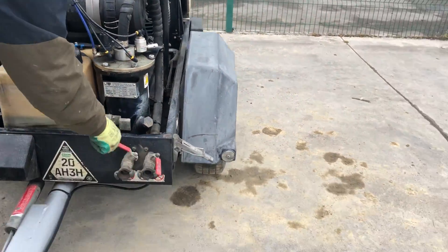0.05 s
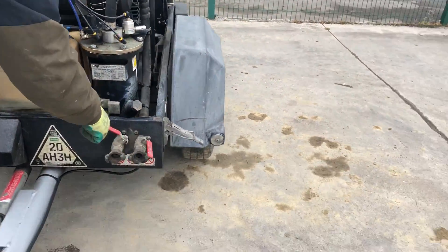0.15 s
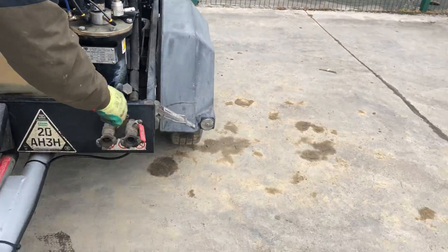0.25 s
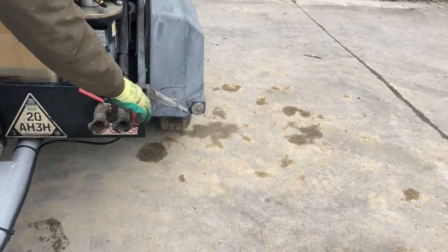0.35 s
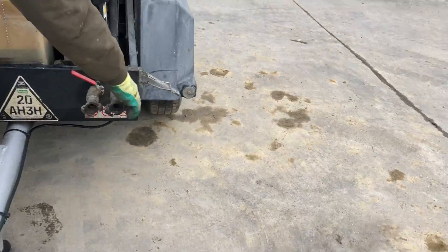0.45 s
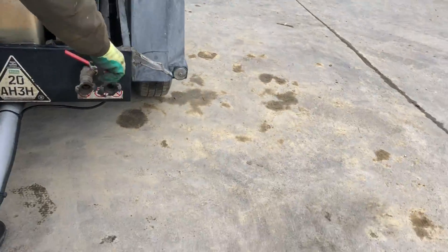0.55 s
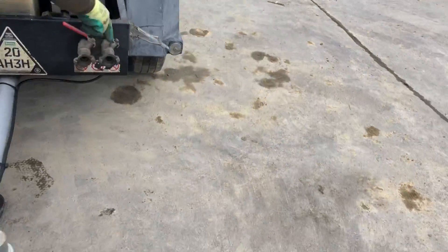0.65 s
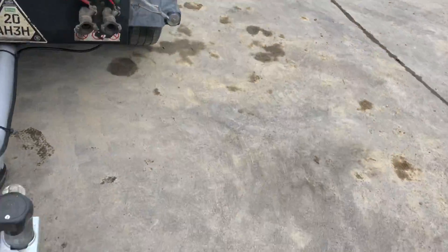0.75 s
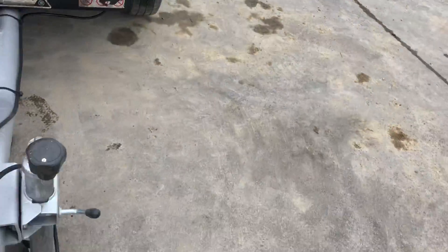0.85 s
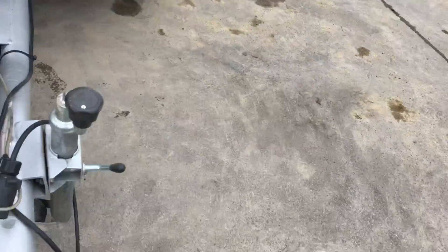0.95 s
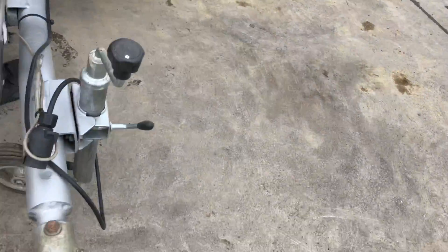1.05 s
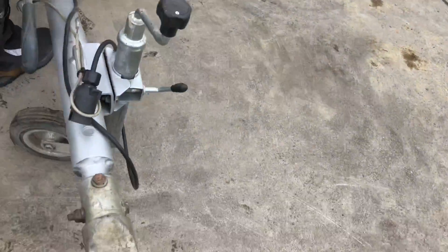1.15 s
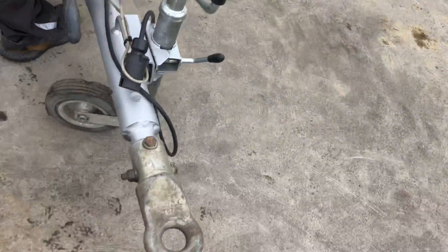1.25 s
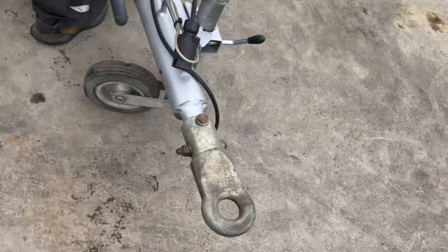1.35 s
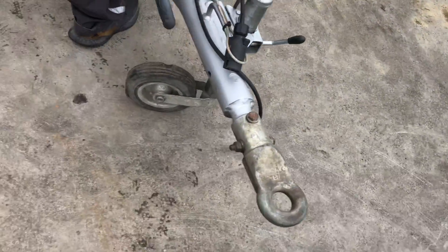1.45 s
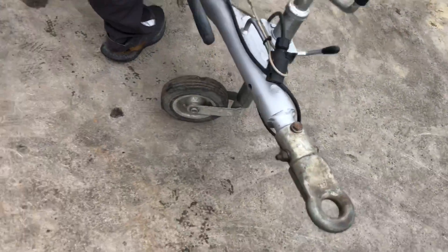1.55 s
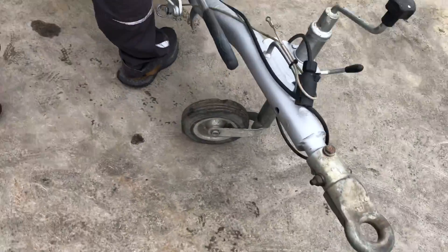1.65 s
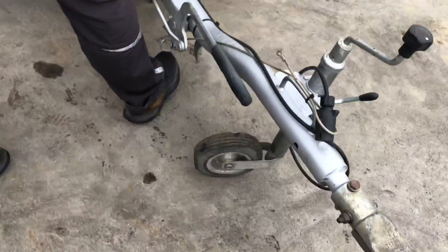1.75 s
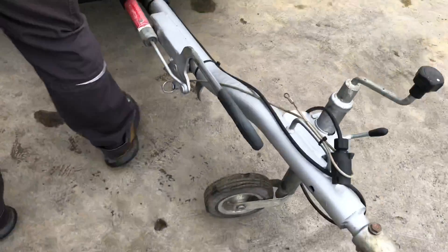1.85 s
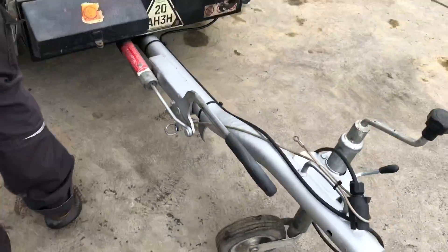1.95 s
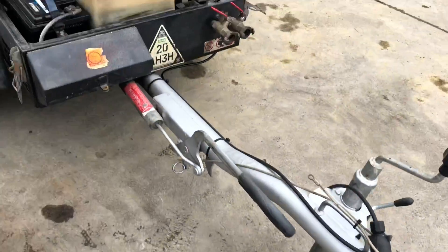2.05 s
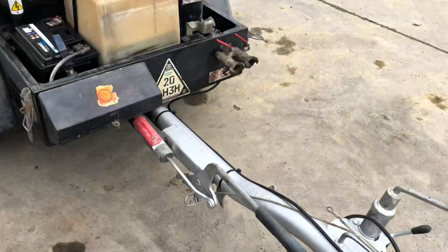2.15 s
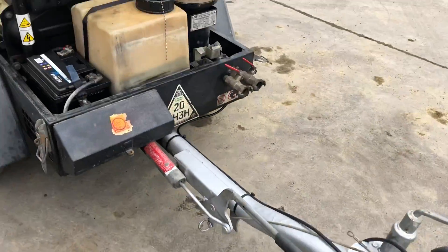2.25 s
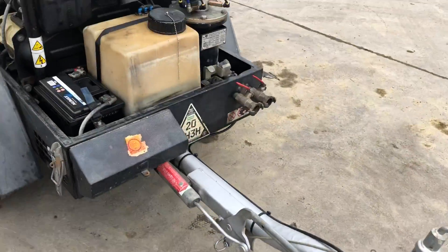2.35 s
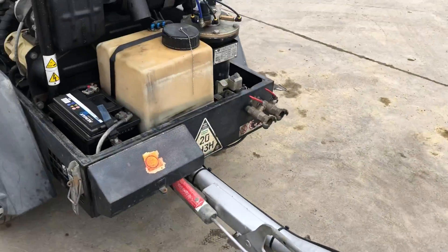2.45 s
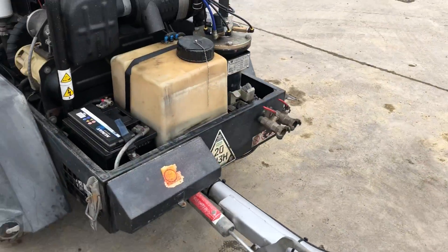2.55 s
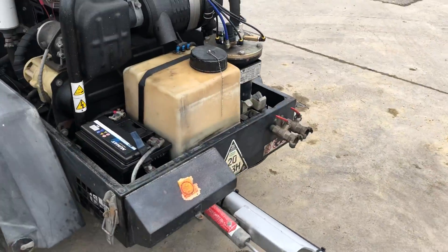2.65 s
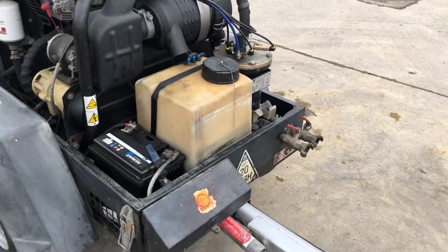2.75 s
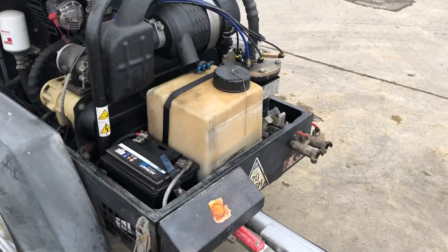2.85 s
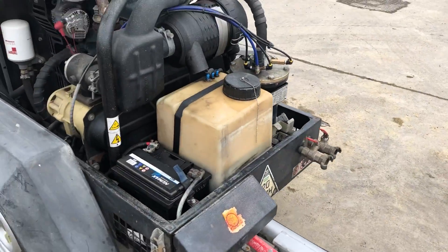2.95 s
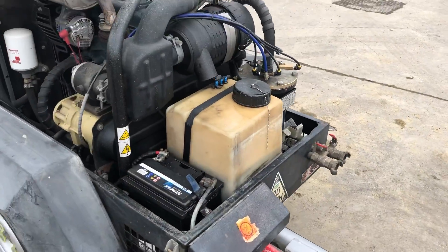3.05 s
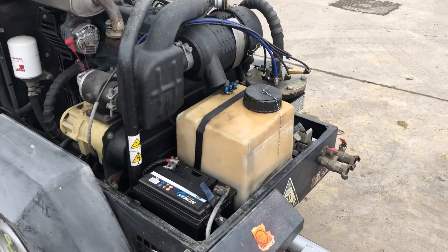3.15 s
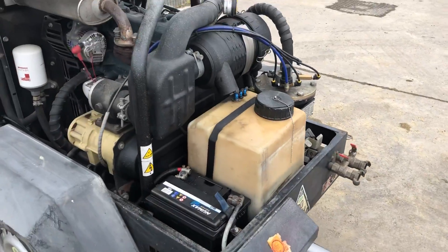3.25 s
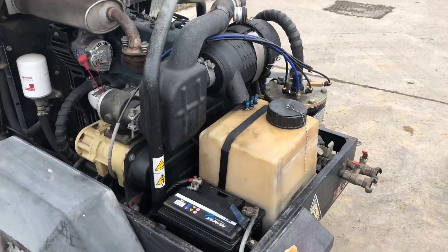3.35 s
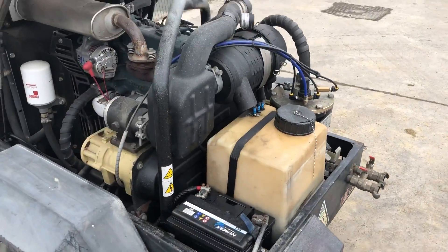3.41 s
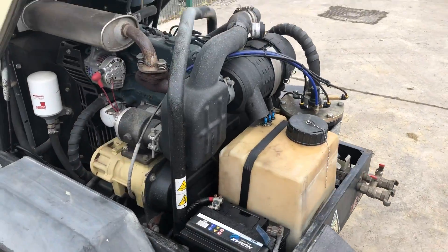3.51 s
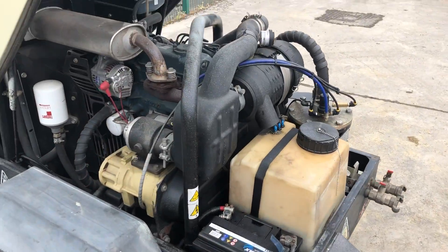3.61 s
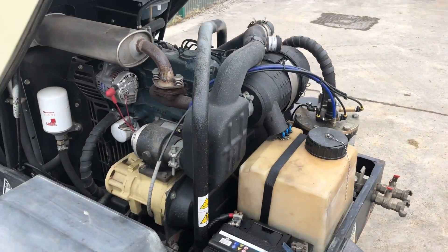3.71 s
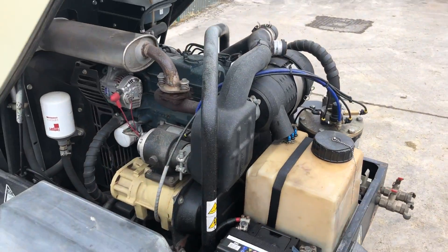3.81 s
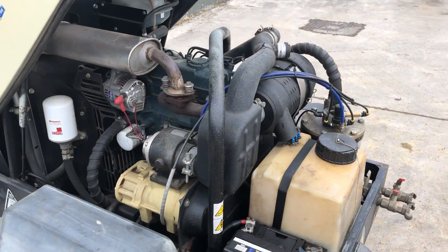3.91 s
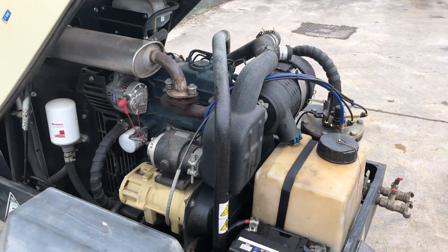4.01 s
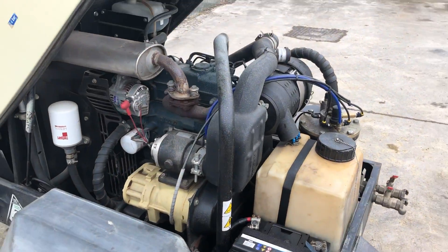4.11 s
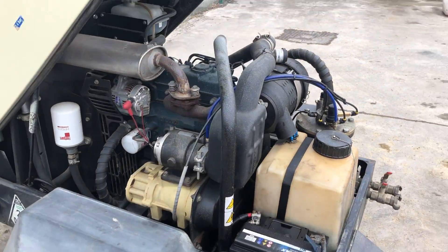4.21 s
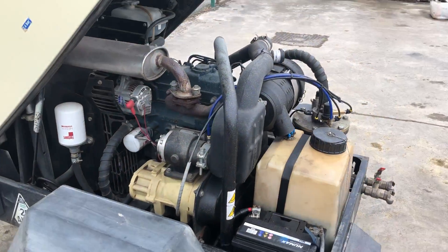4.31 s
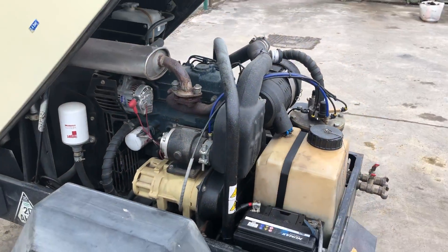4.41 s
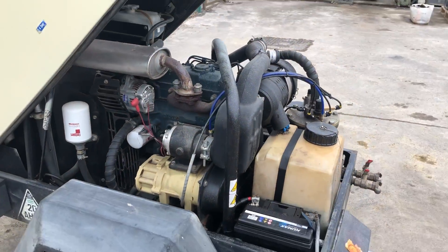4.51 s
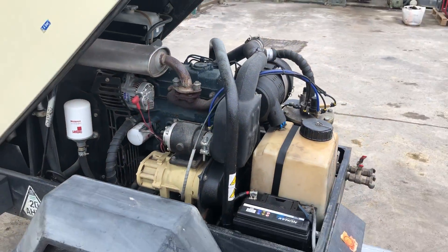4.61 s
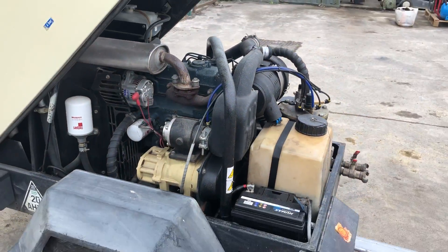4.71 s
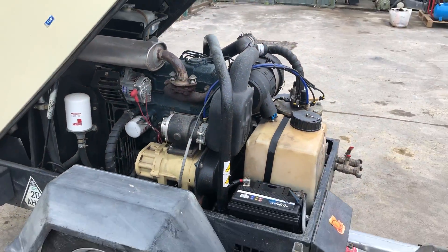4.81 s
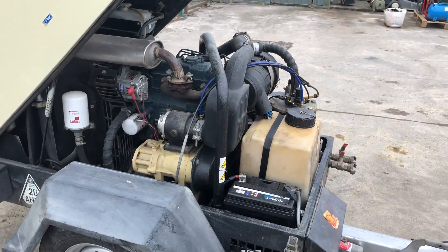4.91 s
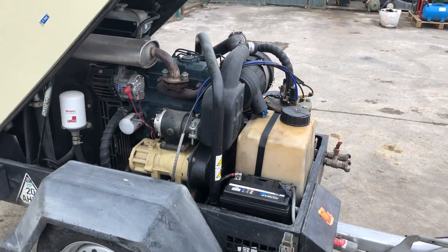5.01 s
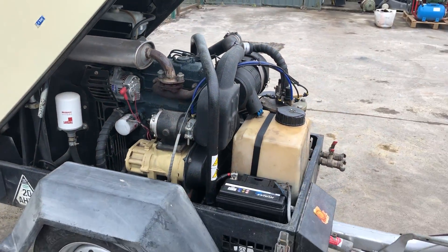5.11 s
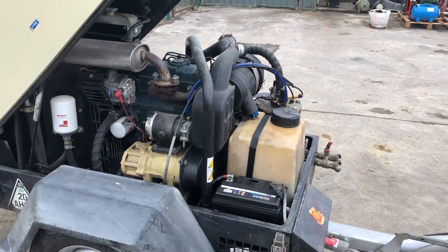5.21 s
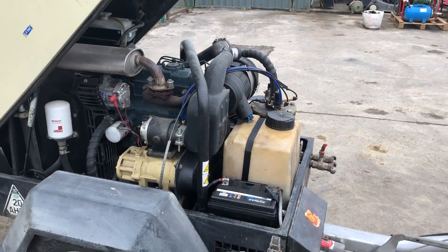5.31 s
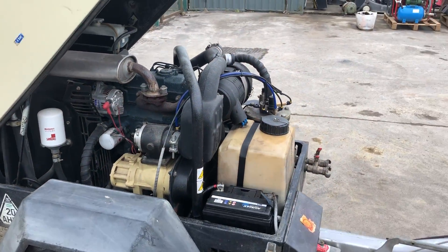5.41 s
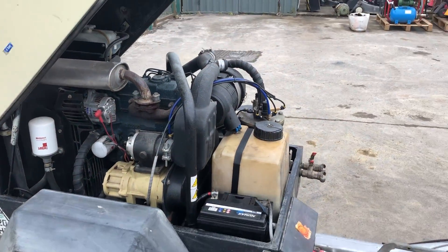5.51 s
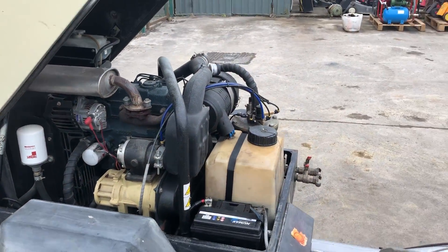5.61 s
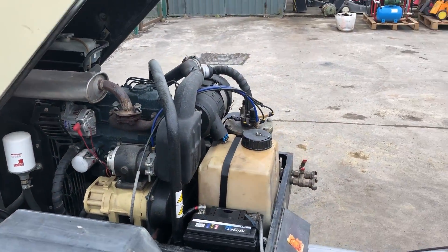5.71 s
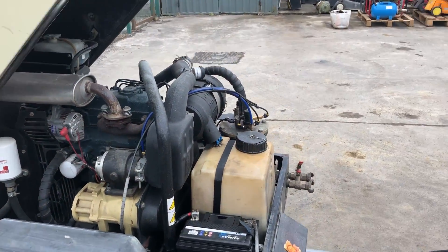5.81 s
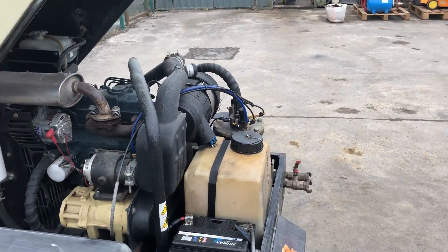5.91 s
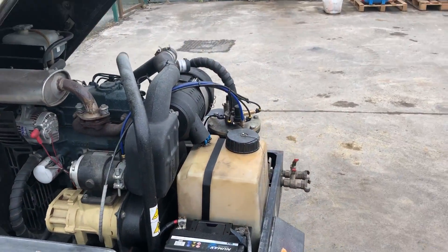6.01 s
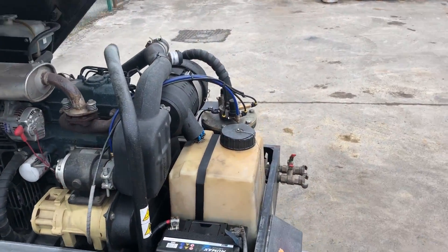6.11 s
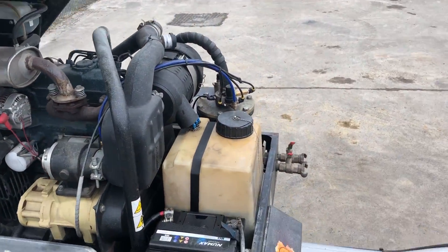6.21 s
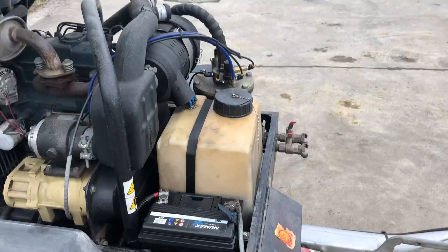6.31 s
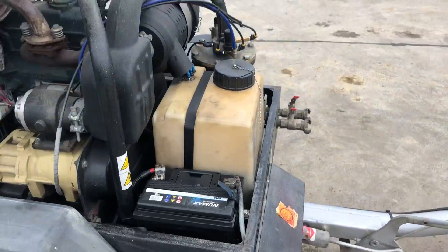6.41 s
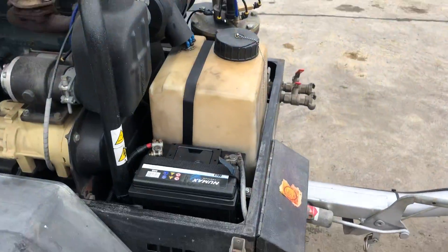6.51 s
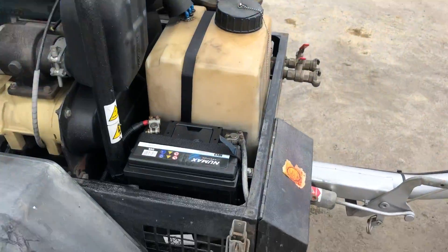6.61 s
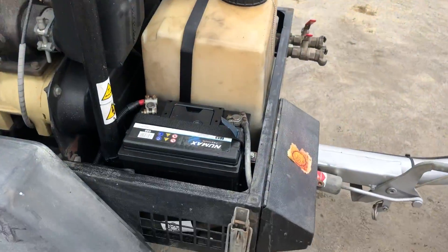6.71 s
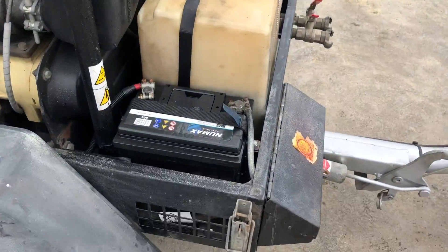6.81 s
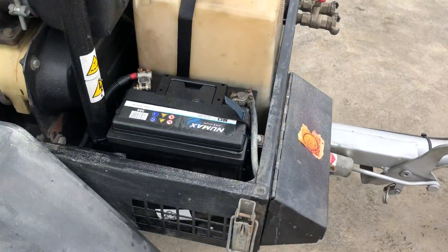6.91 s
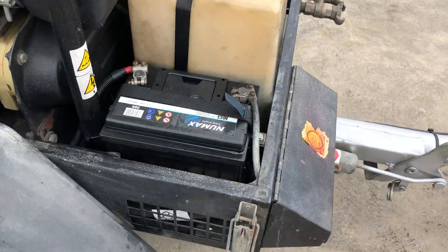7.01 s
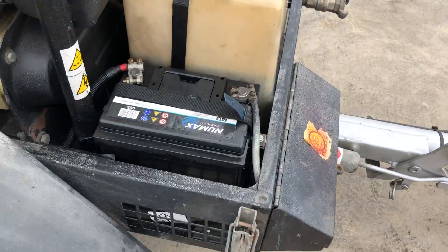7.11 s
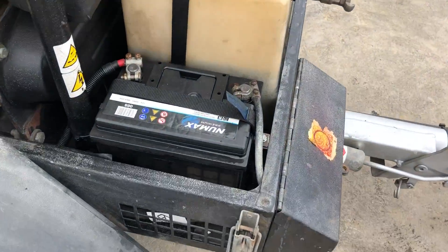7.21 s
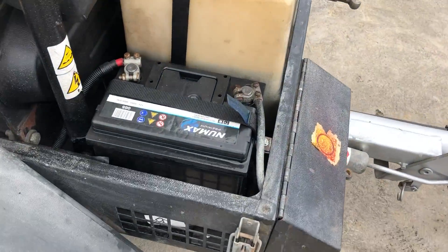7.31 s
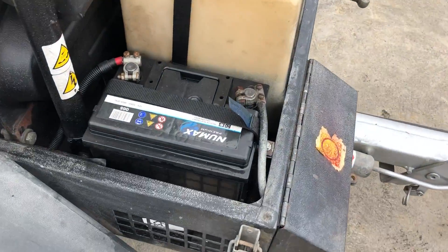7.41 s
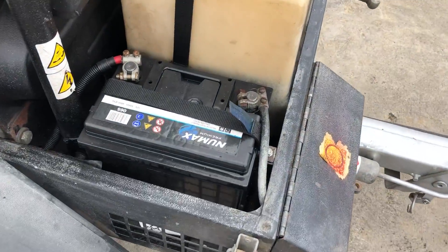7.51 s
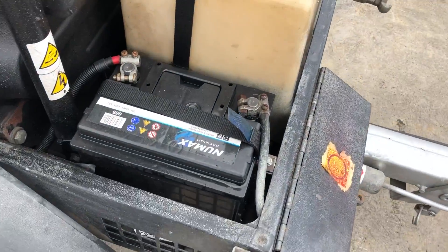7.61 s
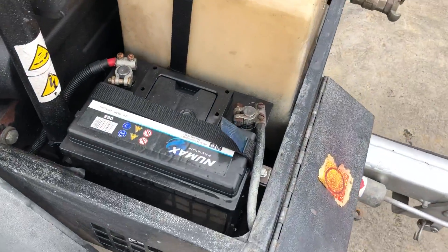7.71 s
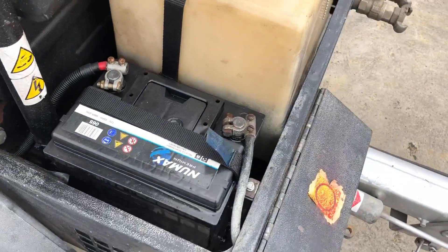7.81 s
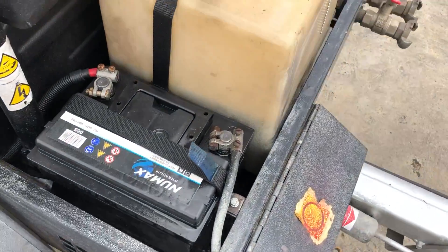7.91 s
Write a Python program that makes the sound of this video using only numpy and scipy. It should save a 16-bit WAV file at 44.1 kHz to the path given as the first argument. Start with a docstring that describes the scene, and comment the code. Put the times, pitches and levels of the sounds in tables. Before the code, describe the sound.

Compressed air hisses loudly from an open valve, chokes off abruptly, then a diesel compressor drops to idle and its clatter grows louder up close.

```python
"""Air compressor: outlet valve shut, then a walk to the engine

A three-cylinder diesel air compressor runs in a concrete yard while air roars from its open outlet valve: combed noise.
Puffs of air thump the microphone as falling tones, thickest as the valve closes; once it is shut, the unloaded
engine drops to idle. The microphone is carried round the drawbar to the open canopy, where knock and clatter
(blows ringing the block), fan and whine (tones geared to the engine) grow loud."""
import sys
import numpy as np
from scipy import signal
from scipy.fft import rfft, irfft, next_fast_len
from scipy.io import wavfile
from scipy.ndimage import map_coordinates

SR = 44100
rng = np.random.default_rng(int(sys.argv[2]) if len(sys.argv) > 2 else 0)


def int16_out(signal):
    """Quantize to a 16-bit WAV file."""
    q = np.round(np.clip(np.atleast_2d(signal).T, -1, 1) * 32767)
    wavfile.write(sys.argv[1], SR, q.astype(np.int16))


N = 350595
TIME = np.arange(N) / SR

# Engine speed, dropping to idle once the valve is shut. Each row: time in seconds, firings a second.
ENGINE_SPEED = [(0, 75.75), (0.99, 75.62), (1.17, 60.78), (1.38, 47.03), (1.65, 48.16), (2.5, 47.6),
                (3.3, 47.79), (6.2, 47.77), (7.95, 47.29)]
# Two moves of the microphone. Each row: begun, complete, starting back and over, all in seconds.
BEHIND_CANOPY = (0.78, 1.08, 1.62, 2.15)  # low at the drawbar's tip, the engine hidden
HELD_HIGH = (4.101, 4.9, 5.75, 6.6)  # raised over the open bay
# The valve, in seconds: the lever starts to turn, the gap is nearly closed, it seals.
TURN, SEAT, SHUT = 0.51, 0.683, 0.711


def amp(db):
    """Decibels to gain."""
    return 10 ** (np.asarray(db) / 20)


def unit(x):
    """Scale to rms 1."""
    return x / np.sqrt(np.mean(x ** 2) + 1e-20)


def curves(rows):
    """One value per sample for each column after the time."""
    seconds, *columns = np.transpose(rows)
    return [np.interp(TIME, seconds, column) for column in columns]


def colour(points, hz):
    """Gain of (Hz, dB) points joined on a log axis."""
    f, db = np.transpose(points)
    return amp(np.interp(np.log(hz + 1), np.log(f), db))


def filtered(x, response):
    """x times a response of frequency."""
    size = next_fast_len(len(x) + SR // 4)
    hz = np.fft.rfftfreq(size, 1 / SR)
    return irfft(rfft(x, size) * response(hz), size)[:len(x)]


def below(hz, edge_hz, order=4):
    """Low-pass gain; one minus it is the matching high-pass."""
    return 1 / (1 + (hz / edge_hz) ** order)


def noise():
    """White noise of rms 1."""
    return rng.standard_normal(N)


def wobble(rate):
    """A smooth random curve, rate knots a second."""
    knots = rng.standard_normal(int(N * rate / SR) + 4)
    return map_coordinates(knots, [TIME * rate])


def narrow(turns, width_hz):
    """A fuzzy tone: a band of noise that follows a phase in turns."""
    phase = 2 * np.pi * turns
    return unit(wobble(width_hz) * np.cos(phase) + wobble(width_hz) * np.sin(phase))


def move(times):
    """0 to 1 and back: a move is made, held and undone."""
    return np.interp(TIME, np.sort(times), [0, 1, 1, 0])


def nearness():
    """Level in dB as the microphone starts far off and walks up to the engine; every engine layer follows it."""
    # Each row: time in seconds, level in dB.
    walk = [(0, -48.5), (0.8, -44.5), (1.06, -43), (1.34, -46), (1.95, -42.5), (2.45, -36), (4.1, -23),
            (5.6, -24.5), (7.31, -20.5), (7.93, -20), (7.95, -21)]
    return curves(walk)[0]


def frontal():
    """The microphone's place: 1 at the drawbar, 0 beside the open canopy."""
    # Each row: time in seconds, place from 0 to 1.
    places = [(0, 1), (2.5, 0.64), (3.6, 0.09), (6, 0.019), (7.9, 0.48)]
    return np.clip(curves(places)[0], 0, 1)


def drive(idle_rate=48, full_above=8.7):
    """0 at idle, 1 once the engine makes full_above more firings a second and sounds fully driven."""
    return np.clip((curves(ENGINE_SPEED)[0] - idle_rate) / full_above, 0, 1)


def crank():
    """Running counts of firings and of engine cycles, three firings to a cycle."""
    firings = np.cumsum(curves(ENGINE_SPEED)[0]) / SR
    firings -= np.interp(4.0197, TIME, firings)  # a pulse crests at this second
    return firings, firings / 3


def clatter(cycles, ring_t60=0.12, tick_t60=0.031, jitter_s=.00006, tick_scatter_db=1.9,
            knock_db=-1.0, rush_db=-2, surge=0.12):
    """Every blow rings the block in its own way each cycle and ticks sharply; rushing air surges per firing."""
    # Blows of pistons, injectors and valves. Each row: share of the cycle, relative levels of knock and tick in dB.
    blows = [(0.0, -3.5, -5), (0.14, -3, -5), (0.27, 1.5, 5), (0.325, -10, -2), (0.53, -0.5, 1),
             (0.645, 1.5, 2.5), (0.7, -7.5, -9), (0.81, 1.5, -2.5), (0.96, -8.5, 2)]
    t = np.arange(SR // 8) / SR
    knocks, taps = np.zeros(N), np.zeros(N)
    whole = np.arange(np.ceil(cycles[0]), np.floor(cycles[-1]) + 1)
    for share, blow_db, tap_db in blows:
        seconds = np.interp(whole + share, cycles, TIME, right=-1)
        seconds = seconds + jitter_s * rng.standard_normal(len(whole))
        at = np.round(seconds * SR).astype(int)
        at = at[(at >= 0) & (at < N)]
        ring = rng.standard_normal(len(t)) * amp(-60 * t / ring_t60)
        blow_train = amp(blow_db) * np.bincount(at, minlength=N)
        knocks += signal.fftconvolve(blow_train, ring)[:N]
        tap_gains = amp(tap_db + tick_scatter_db * rng.standard_normal(len(at)))
        taps += np.bincount(at, tap_gains, N)
    tick_envelope = signal.fftconvolve(taps, amp(-60 * t / tick_t60))[:N]
    ticks = unit(noise() * tick_envelope)
    heavy = filtered(unit(knocks), lambda hz: below(hz, 1370, order=2))
    sharp = filtered(ticks, lambda hz: 1 - below(hz, 4700, order=2))
    rush = noise() * (1 + surge * np.cos(2 * np.pi * 3 * cycles))
    return amp(knock_db) * heavy + sharp + amp(rush_db) * rush


def engine(cycles, low_db=-2.5, middle_db=-3.0, high_db=-6.5, middle_shade_db=-8, high_shade_db=-9,
           high_front_db=-4, high_lift_db=0.6):
    """The clatter sounds through block and panels; the canopy shades middle and treble but not the bass."""
    # Engine block and canopy. Each row: frequency in Hz, relative spectrum level in dB.
    block = [(30, -26), (76, -6.5), (130, -6.5), (219, -8), (313, -5), (340, -1), (477, -2.5), (538, -6),
             (657, -6.5), (819, -5.5), (961, -6), (1650, -15), (2410, -14), (3010, -17.5), (4960, -20),
             (15500, -36)]
    # Panels heard beside the canopy. Each row: resonance in Hz, width in Hz, gain added in dB.
    side_panels = [(218, 94, -4.5), (688, 132, 2.5), (937, 58, -2), (1115, 38, -12), (1345, 130, -7),
                   (1574, 21, 0), (1885, 78, -6.5), (2270, 170, -9), (4880, 1000, -7)]
    # Panels heard from the drawbar. Each row: resonance in Hz, width in Hz, gain added in dB.
    front_panels = [(226, 60, 4), (375, 190, -30), (640, 73, 1.5), (1805, 150, 2), (2110, 86, 4.5),
                    (2490, 66, -17), (4770, 670, -10)]
    source, front, hidden = clatter(cycles), frontal(), move(BEHIND_CANOPY)

    def ringing(panels, hz):
        return 1 + sum(amp(db) / (1 + (2 * (hz - centre) / width) ** 2) for centre, width, db in panels)

    def through(panels):
        return unit(filtered(source, lambda hz: colour(block, hz) * ringing(panels, hz)))

    sound = front * through(front_panels) + (1 - front) * through(side_panels)
    low = filtered(sound, lambda hz: below(hz, 1200, order=8))
    high = filtered(sound, lambda hz: 1 - below(hz, 5500, order=8))
    middle = sound - low - high
    middle_level_db = middle_db + middle_shade_db * hidden
    high_level_db = high_db + high_shade_db * hidden + high_front_db * front + high_lift_db * move(HELD_HIGH)
    bands = amp(low_db) * unit(low) + amp(middle_level_db) * unit(middle) + amp(high_level_db) * unit(high)
    return amp(nearness()) * bands


def throb(firings, close_db=-23, unsteady_db=0.25, falter_db=-5, falter_at=0.74, falter_s=0.05):
    """Each firing pushes out a rounded pressure pulse; the intake booms eight times in each cycle of three firings."""
    # Pulses of exhaust and intake: one row each for the first three harmonics and the intake boom.
    # Each row: level in dB at idle up close, dB gained per dB of nearness, then dB added at full speed,
    # behind the canopy and held high.
    pulses = [(-24.5, 1.0, 10, 3, -3.5), (-27.5, 0.77, -1, 0.5, 3.5), (-27, 1.02, -9, 2.8, -3.5),
              (-34.5, 1.5, 7, 8.3, -1)]
    multiples = 1, 2, 3, 8 / 3  # of the firing rate
    nearer_db = nearness() - close_db  # close_db is the nearness right beside the engine
    fast, hidden, high = drive(), move(BEHIND_CANOPY), move(HELD_HIGH)
    # all dip briefly just after the valve shuts
    dip_db = falter_db * np.exp(-((TIME - falter_at) / falter_s) ** 2)
    out = np.zeros(N)
    for k, (idle_db, slope, fast_db, hidden_db, high_db) in zip(multiples, pulses):
        level_db = idle_db + slope * nearer_db + fast_db * fast + hidden_db * hidden + high_db * high
        gain = amp(level_db + dip_db + unsteady_db * wobble(13))
        out += gain * np.cos(2 * np.pi * k * firings)
    return out


def drone(cycles, waver_db=2.0, rumble_db=-18):
    """Frame and panels hum at some multiples of the cycle rate, over a soft rumble."""
    # Each row: multiple of the cycle rate, level in dB against nearness beside the canopy, the same at the drawbar.
    hums = [(5, -26, -19), (12, -13, -15), (13, -21.5, -24), (14, -18, -25), (15, -23.5, -9),
            (16, -15, -13), (18, -23, -26), (23, -20.5, -19), (24, -20, -39), (30, -9, -17.5),
            (39, -22, -12.5), (42, -17.5, -17), (72, -18, -24)]
    front = frontal()
    hum = np.zeros(N)
    for k, side_db, front_db in hums:
        level_db = side_db + front * (front_db - side_db) + waver_db * wobble(1.993)
        # low multiples of the firing rate crest with the pressure pulse and sharpen it
        lag = 0 if round(k) in (12, 15, 18) else rng.random()
        hum += amp(level_db) * np.sqrt(2) * np.cos(2 * np.pi * (round(k) * cycles + lag))
    soft = [(20, -28), (45, -21), (100, -9), (180, 10), (300, -16), (900, -70)]  # Hz, relative dB
    rumble = unit(filtered(noise(), lambda hz: colour(soft, hz)))
    return amp(nearness()) * (hum + amp(rumble_db) * rumble)


def fan(firings, level_db=-7.0, overtones_db=(0, -12, -15), waver_db=0.8, shade_db=-4, held_high_db=-4.0,
        fast_db=-5):
    """The belt-driven fan's blade tone and its overtones, loudest straight beside the open bay."""
    blades = 6.533 * firings  # blade passes per firing, set by the belt
    tone = np.zeros(N)
    for k, db in enumerate(overtones_db, 1):
        turns = k * (blades + 0.036 * wobble(12))
        tone += amp(db + waver_db * wobble(4.7)) * np.cos(2 * np.pi * turns)
    place_db = shade_db * move(BEHIND_CANOPY) + held_high_db * move(HELD_HIGH)
    return amp(nearness() + level_db + place_db + fast_db * drive()) * np.sqrt(2) * tone


def whine(firings, level_db=-14.5, line_db=-3.0, fuzz_db=-6.0, octave_db=-6, loaded_db=2.5, shade_db=-7,
          flutter=0.18):
    """The air end sings a tone that flutters once an engine cycle, and a rough octave; at speed it is hoarser."""
    # Swells as the microphone passes openings in the canopy.
    # Each row: centre in seconds, half length in seconds, rise in dB.
    swells = [(1.8, 0.9, 6), (4.03, 0.64, 8), (6.5, 0.52, 7.5)]
    mesh = 50.8 * firings  # turns of the whine's phase
    fast = drive()
    line = np.cos(2 * np.pi * (mesh + .15 * wobble(25)))
    line = unit(line * (1 - flutter * np.cos(2 * np.pi * firings / 3)))
    idle = amp(line_db) * line + amp(fuzz_db) * narrow(mesh, width_hz=120)
    idle += amp(octave_db) * narrow(2 * mesh, width_hz=300)
    hoarse = narrow(mesh, width_hz=400) + amp(-4) * narrow(2 * mesh, width_hz=610)
    swell_db = sum(db * np.exp(-((TIME - s) / half) ** 2) for s, half, db in swells)
    gain = amp(nearness() + level_db + swell_db + shade_db * move(BEHIND_CANOPY))
    return gain * ((1 - fast) * idle + fast * amp(loaded_db) * hoarse)


def valve_ping(cycles, level_db=-20, hz=8550, share=0.02, length=0.07, width_hz=350):
    """From above the open bay, one engine valve is heard to ping once a cycle."""
    offset = (cycles - share + .5) % 1 - .5  # share and length are parts of a cycle
    pulse = np.exp(-(offset / length) ** 2)
    return amp(nearness() + level_db) * move(HELD_HIGH) * pulse * narrow(hz * TIME, width_hz)


def whistles(width_hz=110, fade_s=0.036):
    """Modes of the outlet pipe each sing a breathy tone for a while, around the turning of the lever."""
    # Each row: start in seconds, end in seconds, frequency in Hz, level in dB against the hiss.
    modes = [(-0.1, 0.48, 2040, -24.5), (0.24, 0.5, 6700, -10), (0.42, 0.635, 2620, -15),
             (0.55, 0.65, 3210, -11.5)]
    out = np.zeros(N)
    for start, end, hz, db in modes:
        gate = np.clip(np.minimum(TIME - start, end - TIME) / fade_s, 0, 1)
        out += amp(db) * gate * narrow(hz * TIME, width_hz)
    return out


def air_jet(level_db=-15.5, throttled_db=1.0, seated_db=-7, turn_s=0.12, seat_s=0.018, flutter_db=0.66,
            shut_t60=0.011, roar_db=-25, seated_roar_db=13, echo_db=-4):
    """Turbulent hiss, combed by bounces between frame and concrete; it broadens, sags at the seat and stops."""
    # Hiss of the open outlet, humped by the modes of its short pipe.
    # Each row: frequency in Hz, relative spectrum level in dB.
    open_hiss = [(1100, -30), (1750, -18), (2020, -18), (2300, -12), (2600, -6.5), (3000, -6.5),
                 (3600, 1.5), (5600, -1.5), (6500, 3.5), (7700, 2.5), (8700, -5), (10200, 2), (11400, -11),
                 (12500, -7), (13500, -2)]
    # Hiss through the narrowing gap. Each row: frequency in Hz, relative spectrum level in dB.
    gap_hiss = [(900, -26), (1900, -8.5), (2700, -3.5), (5000, -1.5), (6600, 1.5), (8500, -3), (10000, -1),
                (12000, -8.5), (14500, -3), (15600, -1.5)]
    closing = np.clip((TIME - TURN) / turn_s, 0, 1)
    seated = np.clip((TIME - SEAT) / seat_s + .5, 0, 1)

    def rush(spectrum):
        return unit(filtered(noise(), lambda hz: colour(spectrum, hz)))

    def late(x, delay):
        return map_coordinates(x, [(TIME - delay) * SR])

    hiss = np.sqrt(1 - closing) * rush(open_hiss) + np.sqrt(closing) * rush(gap_hiss)
    # delay off the concrete in seconds, shrinking as the microphone moves
    bounce = .00202 - .00023 * np.minimum(TIME, SHUT)
    echoes = late(hiss, bounce) + .35 * late(hiss, 2 * bounce) + .35 * late(hiss, .00077)
    combed = unit(hiss + amp(echo_db) * filtered(echoes, lambda hz: below(hz, 9000)))
    roar = rush([(30, -30), (80, -2), (300, -7), (900, -9), (2000, -7), (6000, -60)])
    valve_db = throttled_db * closing + seated_db * seated - 60 * np.maximum(TIME - SHUT, 0) / shut_t60
    flow = combed + whistles() + amp(roar_db + seated_roar_db * seated) * roar
    return amp(level_db + valve_db + flutter_db * wobble(90.8)) * flow


def valve_squeal(level_db=-33, start_hz=9900, end_hz=9350, t60=0.26):
    """The last air whistles through the closing seat, falling in pitch as it fades."""
    t = TIME - 0.69
    pitch = end_hz + (start_hz - end_hz) * np.exp(-np.abs(t) / .02)
    fade = (t > 0) * amp(level_db - 60 * np.abs(t) / t60)
    return fade * narrow(np.cumsum(pitch) / SR, width_hz=270)


def puffs(drop_hz=1250, end_hz=105, fall_s=0.00189, t60=0.044, level_db=1):
    """Each puff of air on the microphone is a short thump of steeply dropping pitch; they end with the flow."""
    # Each row: start in seconds, relative peak level in dB.
    thumps = [(0.0102, -25), (0.018, -21.5), (0.168, -25.5), (0.209, -26), (0.2987, -23.5), (0.675, -26),
              (0.68, -17), (0.6837, -19), (0.687, -23), (0.692, -21.5), (0.702, -24), (0.7074, -19)]
    out = np.zeros(N)
    t = np.arange(SR // 20) / SR
    turns = np.cumsum(end_hz + drop_hz / (1 + (t / fall_s) ** 2.13)) / SR
    shape = (1 - np.exp(-t / 0.0011)) * amp(-60 * t / t60)
    shape /= shape.max()
    for s, db in thumps:
        thump = shape * np.sin(2 * np.pi * (turns + rng.random()))
        out[max(round(s * SR), 0):][:len(t)] += amp(db + level_db) * thump
    out *= amp(-60 * np.maximum(TIME - SHUT, 0) / 0.015)
    return filtered(out, lambda hz: 1 - below(hz, 70))


def scuff(at=1.872, level_db=-57, width_s=.012):
    """A shoe scuffs the concrete faintly: a brief swell of high-passed noise."""
    grit = unit(filtered(noise(), lambda hz: 1 - below(hz, 5000)))
    return amp(level_db) * np.exp(-((TIME - at) / width_s) ** 2) * grit


def scene():
    """The running machine, the blast from its outlet, the puffs and the scuff."""
    firings, cycles = crank()
    machine = engine(cycles) + throb(firings) + drone(cycles) + fan(firings) + whine(firings) + valve_ping(cycles)
    air = air_jet() + valve_squeal() + puffs()
    return (machine + air + scuff())[None]


def record(dry, top_hz=15780):
    """The recorder keeps nothing above its band limit."""
    return filtered(dry[0], lambda hz: hz < top_hz)[None]


dry = scene()
out = record(dry)
int16_out(out)
```